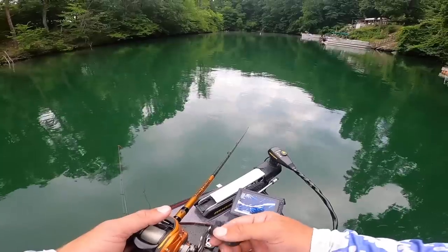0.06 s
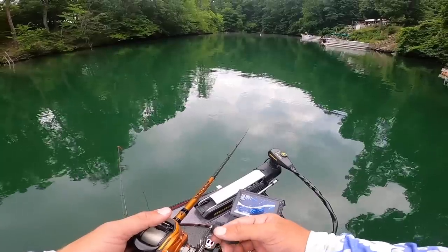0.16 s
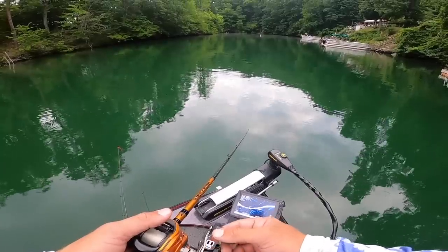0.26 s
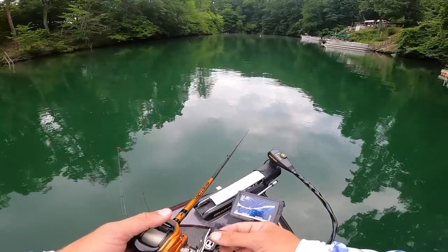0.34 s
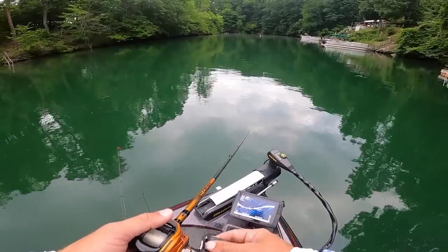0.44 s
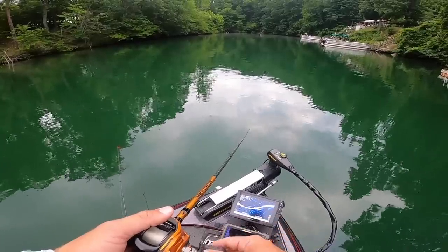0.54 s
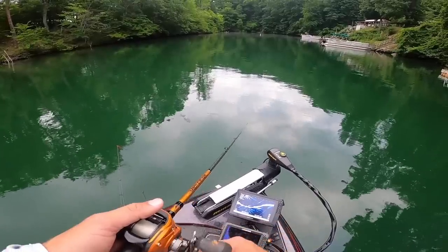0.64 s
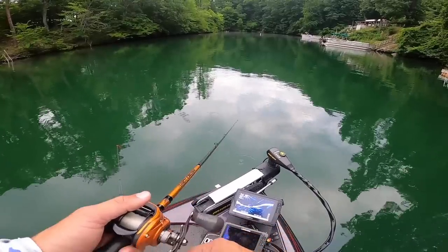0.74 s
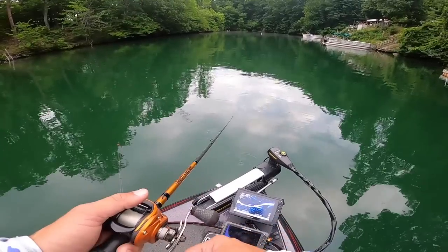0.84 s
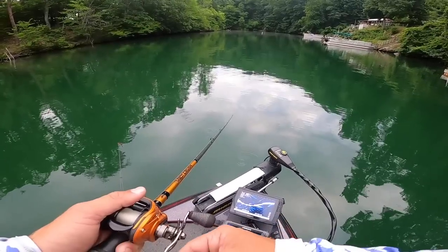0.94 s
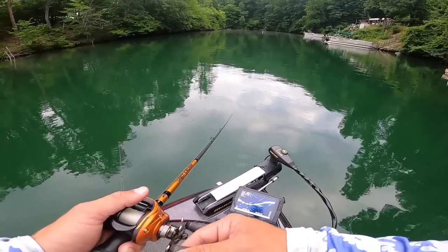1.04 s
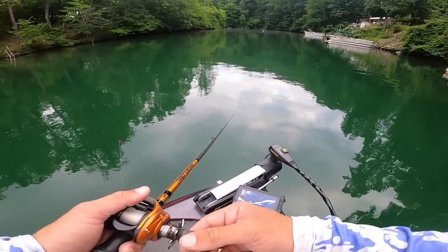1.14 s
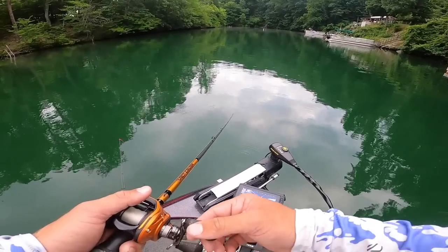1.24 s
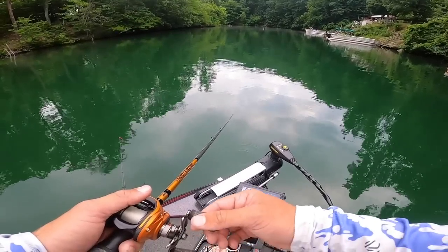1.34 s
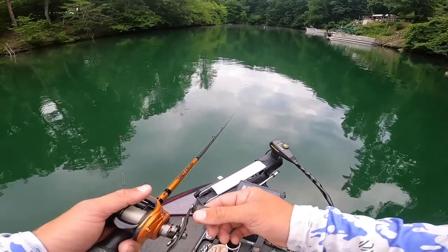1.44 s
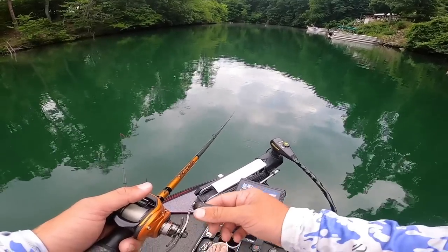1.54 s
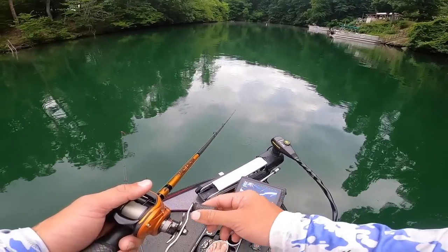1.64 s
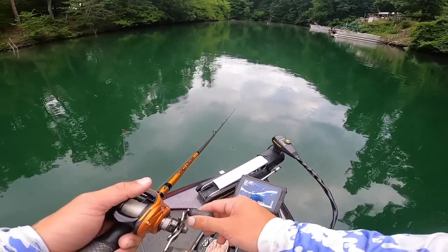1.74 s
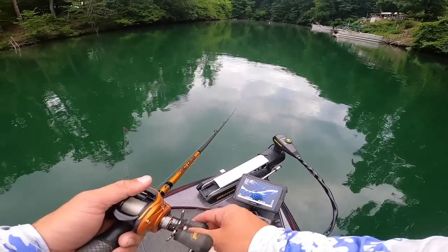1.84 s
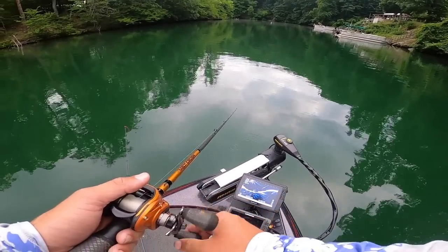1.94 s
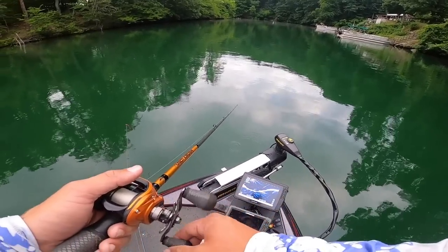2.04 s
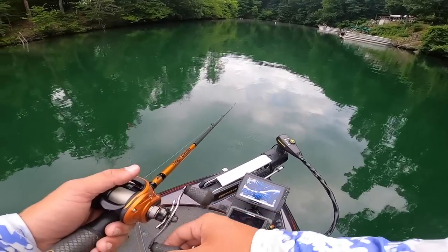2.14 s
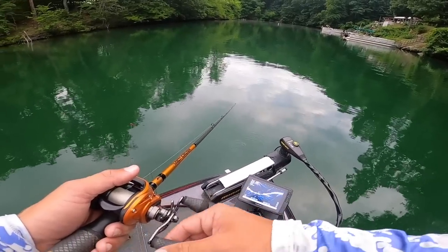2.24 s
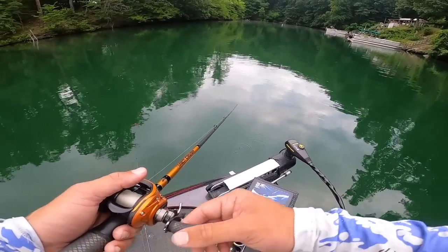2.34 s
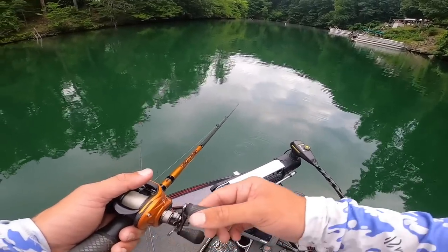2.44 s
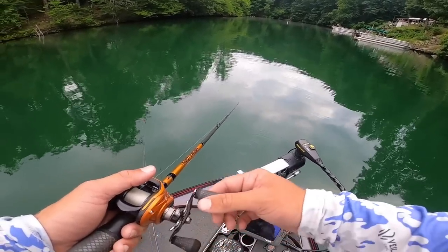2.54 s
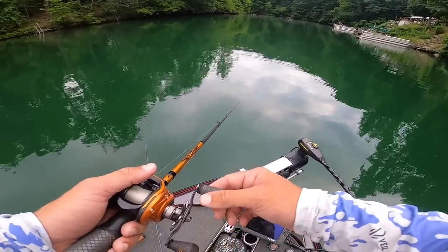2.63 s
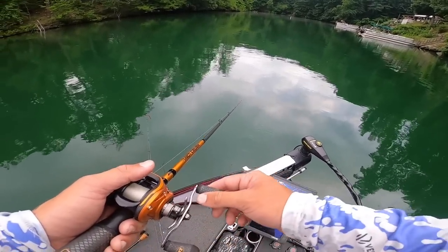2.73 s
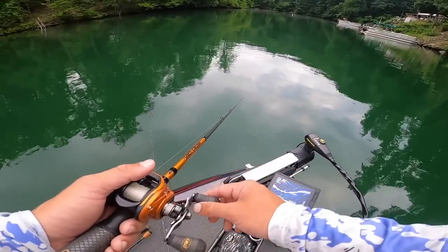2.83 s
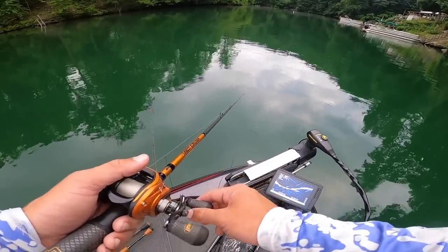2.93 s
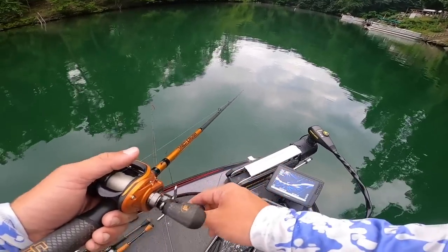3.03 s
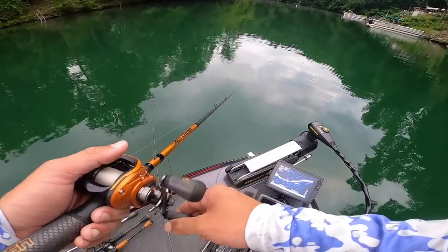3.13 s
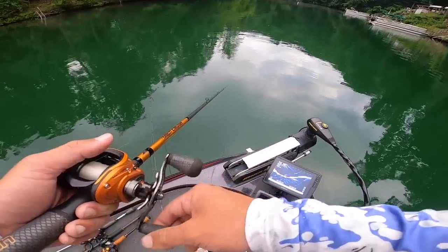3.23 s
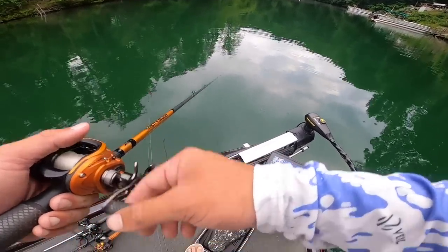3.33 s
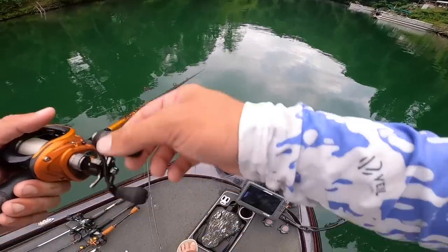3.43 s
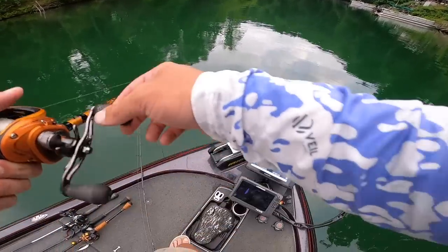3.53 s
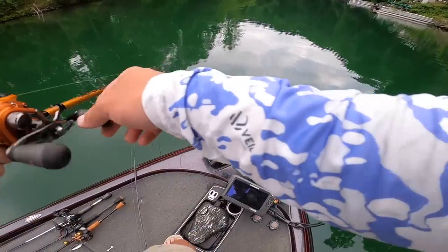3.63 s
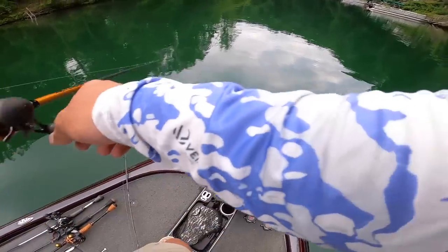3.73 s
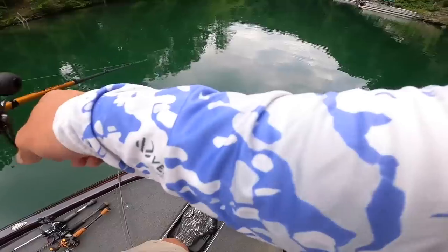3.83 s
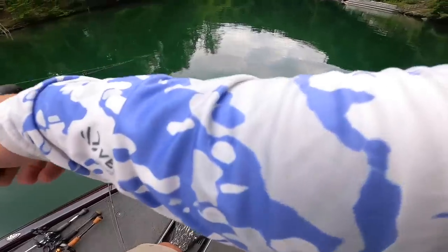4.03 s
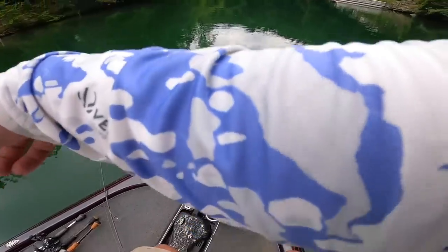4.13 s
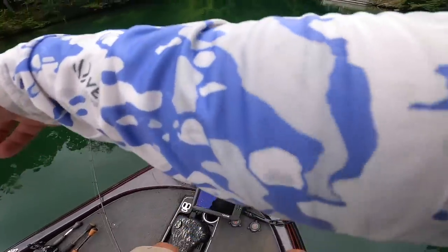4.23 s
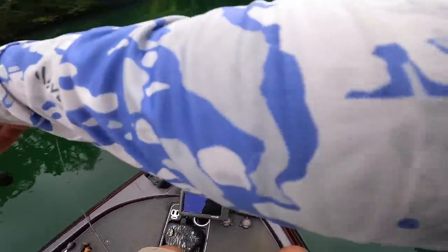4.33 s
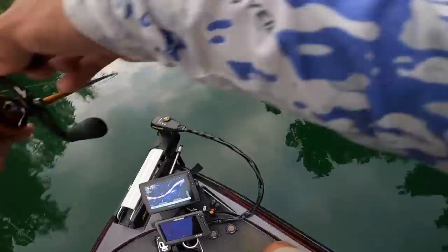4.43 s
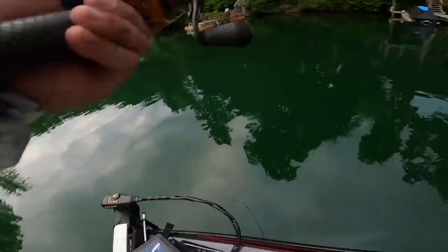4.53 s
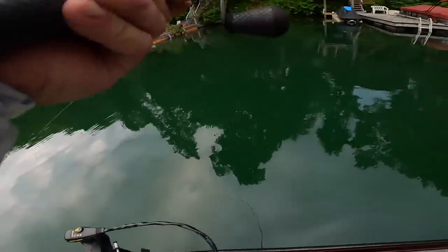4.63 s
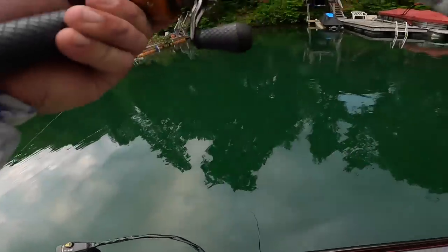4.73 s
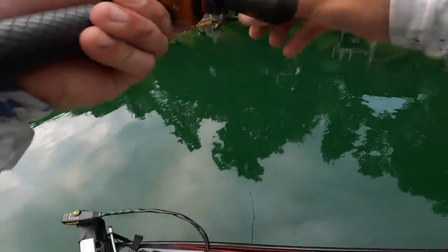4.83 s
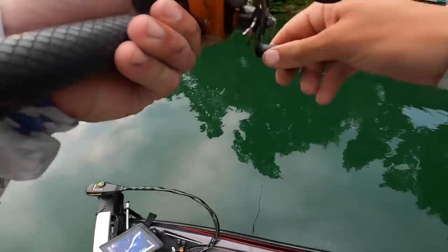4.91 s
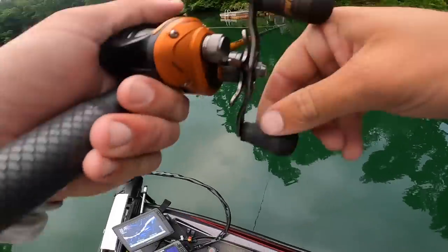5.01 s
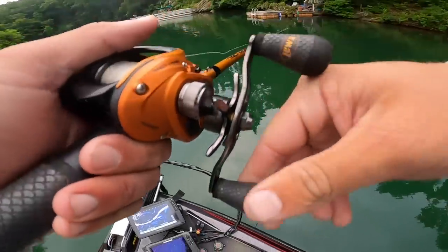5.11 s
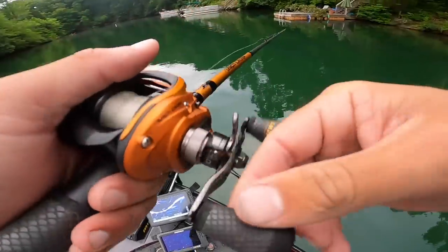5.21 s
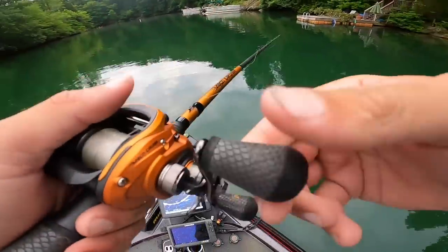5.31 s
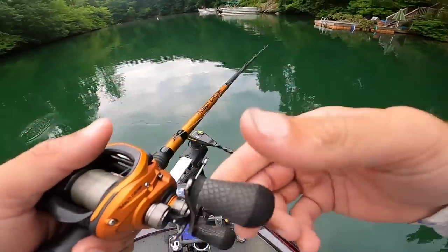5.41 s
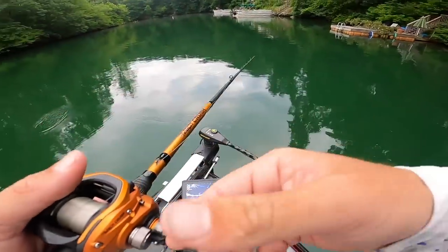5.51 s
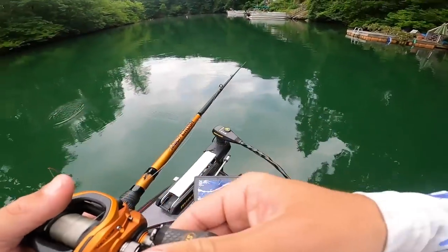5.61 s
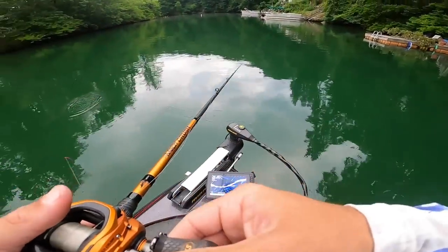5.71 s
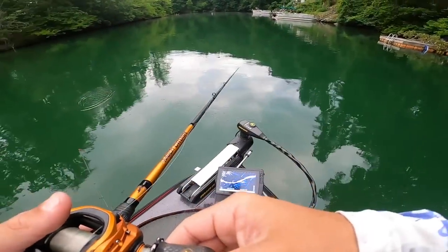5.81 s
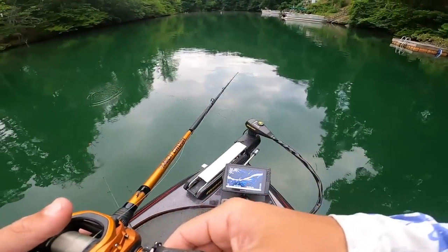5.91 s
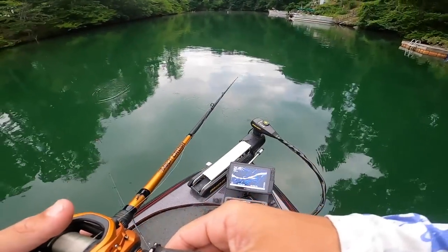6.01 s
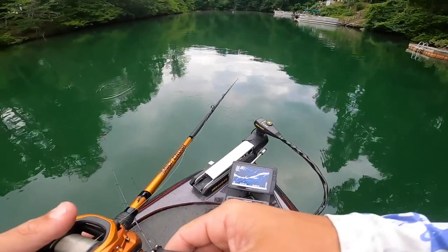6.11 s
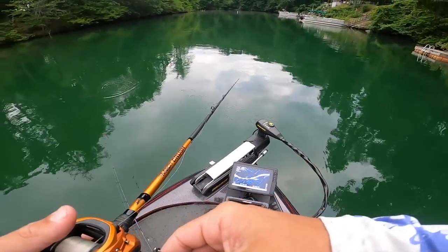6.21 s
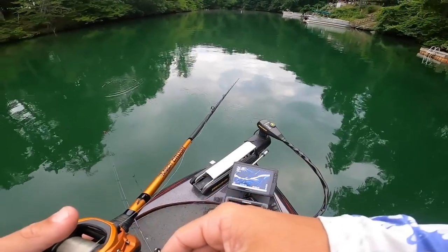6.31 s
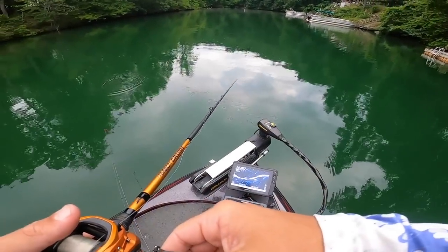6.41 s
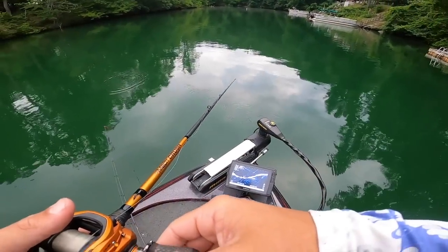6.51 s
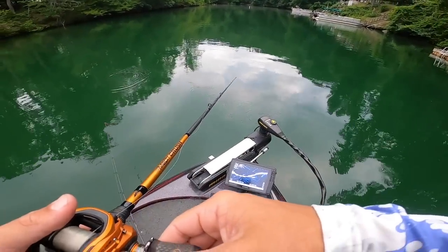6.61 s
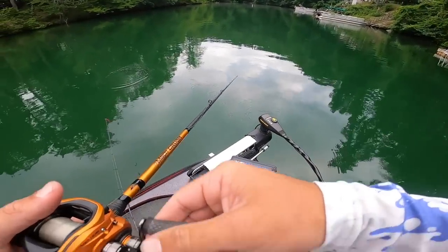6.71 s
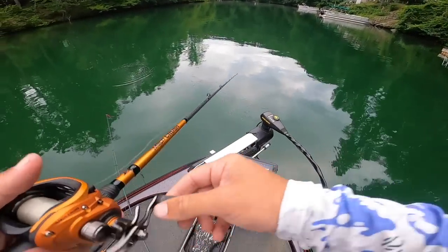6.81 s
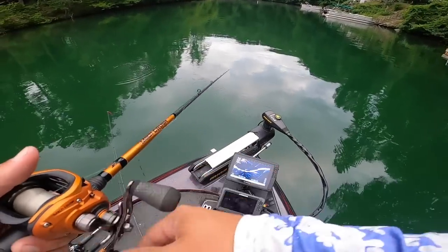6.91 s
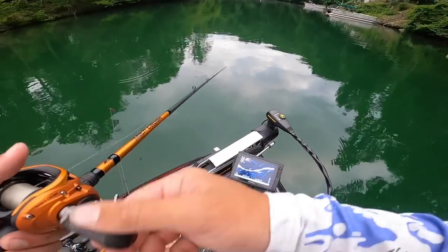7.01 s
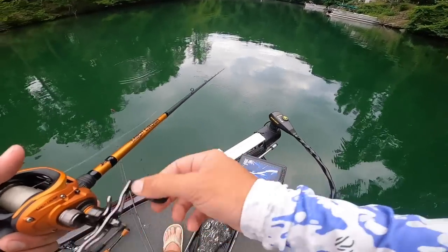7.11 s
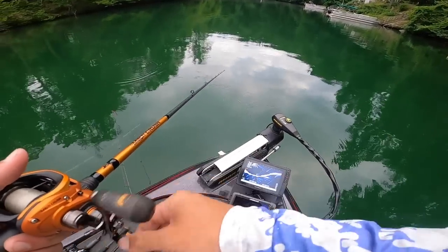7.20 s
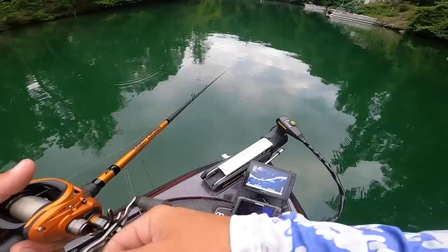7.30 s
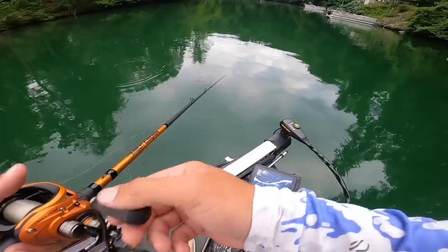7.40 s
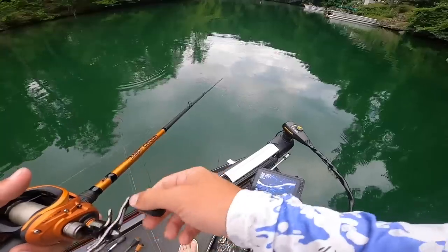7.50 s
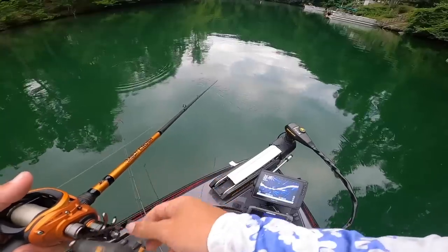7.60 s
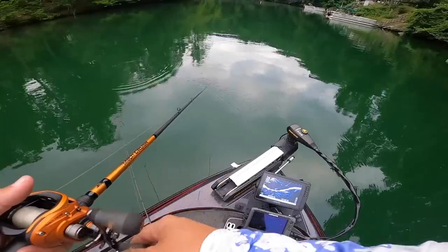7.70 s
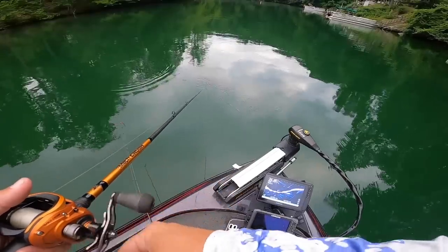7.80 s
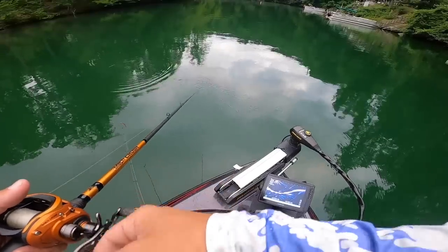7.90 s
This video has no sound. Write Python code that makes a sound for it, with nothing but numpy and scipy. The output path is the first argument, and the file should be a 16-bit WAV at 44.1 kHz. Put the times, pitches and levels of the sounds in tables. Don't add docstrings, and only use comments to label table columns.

```python
import sys
import numpy as np
from scipy import signal
from scipy.fft import rfft, irfft, next_fast_len
from scipy.io import wavfile
from scipy.ndimage import uniform_filter1d, map_coordinates

SR = 44100
rng = np.random.default_rng(int(sys.argv[2]) if len(sys.argv) > 2 else 0)


def materialize(psi):
    bounded = np.clip(np.atleast_2d(psi).T, -1, 1)
    quanta = np.round(bounded * 32767).astype(np.int16)
    wavfile.write(sys.argv[1], SR, quanta)


def voltage_ratio(decibels):
    exponent = np.asarray(decibels, float) / 20
    return 10 ** exponent


N = 350595

# (time [s], left over right [dB])
HAND_SIDE = [(0, 4), (2.2, 1.5), (3.3, 1), (4.4, 1.5), (4.6, 8.5), (5.0, 4), (5.12, 1.5), (7.0, 1),
             (7.9, 22)]


def unit(x):
    return x / np.sqrt(np.mean(x ** 2) + 1e-20)


def along(points, hz):
    f, value = np.transpose(points)
    return np.interp(np.log(hz + 1), np.log(f + 1), value)


def curve(points):
    s, value = np.transpose(points)
    return np.interp(np.arange(N) / SR, s, value)


def wobble(rate):
    knots = rng.standard_normal(int(N * rate / SR) + 4)
    return map_coordinates(knots, [np.arange(N) * rate / SR], order=2)


def during(start, end):
    return (np.arange(N) > start * SR) & (np.arange(N) < end * SR)


def swells(rows):
    t = np.arange(0, N, 32) / SR
    start, end, db, rise, fall = np.array(rows).T[:, :, None]
    before = np.clip((start - t) / rise, 0, None)
    after = np.clip((t - end) / fall, 0, None)
    level = voltage_ratio(db - 20 * before - 20 * after)
    return np.interp(np.arange(N) / SR, t, np.sqrt(np.sum(level ** 2, axis=0)))


def add_at(out, s, hit):
    start = round(s * SR)
    out[..., start:start + hit.shape[-1]] += hit


def filtered(x, response):
    m = next_fast_len(N + SR // 4)
    return irfft(rfft(x, m) * response(np.fft.rfftfreq(m, 1 / SR)), m)[..., :N]


def modes(table):
    def response(f):
        total = 0
        for k, (center, width, db) in enumerate(table):
            damping = 1j * f * width
            total = total + (-1) ** k * voltage_ratio(db) * damping / (center * center - f * f + damping + 1e-9)
        return total
    return response


def band(lo_hz, hi_hz):
    return lambda f: 1 / np.sqrt((1 + (lo_hz / (f + 1)) ** 6) * (1 + (f / hi_hz) ** 6))


def pair(response, grain=1):
    # (frequency [Hz], left-right likeness [0-1])
    likeness = [(30, 0.4), (60, 0.8), (200, 1), (640, 0.57), (1400, 0.78), (6800, 0.39), (12000, 0.091)]

    def mid_side(hz):
        turn = np.arccos(np.clip(along(likeness, hz), -1, 1)) / 2
        return response(hz) * [np.cos(turn), np.sin(turn)]

    mid, side = filtered(grain * rng.standard_normal((2, N)), mid_side)
    return np.array([mid + side, mid - side]) / np.std(mid)


def pan(db):
    half = np.atleast_1d(db) / 2
    return voltage_ratio(np.array([half, -half]))


def patchy(x, depth_db):
    z = signal.stft(x, nperseg=256)[2]
    field = uniform_filter1d(rng.standard_normal(z.shape[1:]), size=4, axis=0)
    field = uniform_filter1d(field, size=5, axis=1)
    return signal.istft(z * voltage_ratio(depth_db * unit(field)), nperseg=256)[1][:, :N]


def lake():
    # (frequency [Hz], density [dB per Hz])
    air_tone = [(40, -43.5), (170, -1), (300, -7), (600, -17), (900, -20), (1150, -12.5), (1700, -16.5),
                (2800, -15.5), (4000, -23), (6000, -20.5), (7600, -27), (8100, -42), (12500, -42.5),
                (15500, -77)]
    # (time [s], level [dB])
    breeze_points = [(0, -62.5), (.7, -62.5), (1.5, -65), (2.4, -60), (2.9, -62), (4.0, -60.5),
                     (4.2, -61.5), (5.5, -57.5), (6.0, -61), (6.2, -70), (6.3, -65), (6.72, -66),
                     (6.9, -60), (7.95, -58.5)]
    # (time [s], level [dB])
    chorus_points = [(0, 0), (2, 0), (4, 0), (5.3, -4), (6, -5), (6.4, 0), (7.95, -3)]
    # (frequency [Hz], width [Hz], level [dB])
    insect_bands = [(7520, 110, 1), (5000, 1600, -6.5), (6250, 300, -11)]
    # (frequency [Hz], width [Hz], level [dB])
    machine = (167.6, 6.6, -64)
    breeze_db = curve(breeze_points)
    air = voltage_ratio(breeze_db + wobble(22)) * pair(lambda f: voltage_ratio(along(air_tone, f)))
    chorus_db = breeze_db + curve(chorus_points) - 16 + 1.4 * wobble(2.68)
    choruses = voltage_ratio(chorus_db) * pair(lambda f: modes(insect_bands)(f) * band(4600, 7800)(f))
    hum = voltage_ratio(machine[2] + 1.2 * wobble(3.6)) * pair(modes([machine]))
    return patchy(air + choruses, depth_db=2.5) + hum


def body_jolts():
    # (time [s], deep rumble [dB], hull boom [dB])
    jolts = [(0.02, -67, -64), (1.05, -65, -60), (1.85, -58, -74), (2.21, -51, -35), (2.55, -53, -46),
             (3.27, -75, -43), (3.45, -48, -36), (3.6, -80, -45.5), (4.07, -60, -46), (4.29, -60, -49),
             (4.5, -55.5, -40), (4.65, -35.5, -39), (4.78, -41, -46.5), (4.9, -40, -41), (5.13, -36, -45),
             (5.45, -42.5, -58), (5.92, -43, -62), (6.35, -54.5, -57), (6.87, -55.5, -54), (7.55, -57, -88),
             (7.75, -59, -69)]
    # (time [s], left over right [dB])
    lean = [(0, 1), (4.4, 1), (5.3, 1), (5.8, 8), (6.5, 5), (7.2, 3), (7.6, 0)]
    rumble_s, boom_s = 0.16, 0.084
    sway = voltage_ratio(-73)
    deep = sway + swells([(s, s, db, rumble_s, rumble_s) for s, db, _ in jolts])
    boom = sway + swells([(s, s, db, boom_s, boom_s) for s, _, db in jolts])
    rumble = deep * pan(curve(lean)) * voltage_ratio(2.8 * wobble(13)) * pair(band(24.3, 57))
    return rumble + boom * voltage_ratio(-3.5 + 3.5 * wobble(25)) * pair(band(83, 172))


def contacts():
    # (time [s], peak [dB], ring [Hz], t60 [ms])
    clacks = [(2.1976, -27, 1170, 23), (2.2103, -35, 1150, 14), (3.219, -27.5, 2320, 5.6),
              (3.3158, -31, 3250, 30), (3.3624, -23, 1600, 45), (3.5053, -36, 1740, 52),
              (3.548, -30, 2950, 27), (3.6557, -34, 3900, 24), (4.054, -43.5, 1430, 81),
              (4.469, -27, 2100, 14), (3.228, -35, 3100, 12), (3.2365, -32, 2400, 12),
              (3.244, -33, 2000, 10), (3.2505, -27, 1900, 20), (3.268, -32, 1700, 18),
              (3.2745, -34, 2300, 14), (3.281, -32, 1500, 14), (3.3225, -34, 3200, 12),
              (6.88, -44, 1890, 15), (6.9257, -35, 1790, 15), (7.199, -39, 1670, 15),
              (7.612, -44, 1770, 15), (6.285, -49.5, 2870, 16), (6.786, -46.5, 1180, 21),
              (6.945, -32, 1710, 8), (7.0945, -38, 1170, 22), (1.8806, -37, 2560, 29)]
    # (time [s], peak [dB], ring [Hz], t60 [ms])
    metal_clicks = [(2.7118, -42.5, 1830, 9.5), (3.2907, -30, 3120, 7.4), (3.4528, -21.5, 3900, 12),
                    (3.4575, -19.5, 3770, 21), (4.5903, -24, 2250, 39), (4.7091, -11.5, 4350, 7),
                    (4.8607, -34.5, 2950, 12), (4.882, -23, 2700, 9.4), (4.943, -25.5, 2860, 8),
                    (5.1107, -26, 3500, 9), (5.1121, -14.5, 3600, 12), (5.1272, -26, 2600, 12),
                    (5.2075, -34.5, 2480, 22), (5.3208, -37, 3630, 14), (5.3971, -23.5, 3420, 23),
                    (5.4225, -36, 3800, 11), (5.4262, -33, 835, 27), (5.665, -40.5, 1740, 13),
                    (7.04, -35, 1790, 13), (7.398, -35.5, 1640, 17)]
    # (time [s], peak [dB], ring [Hz])
    small_ticks = [(0.0997, -57, 6090), (0.1171, -53, 6290), (0.7248, -46, 5570), (1.0814, -53, 6400),
                   (1.28, -48, 4930), (1.5848, -52, 6200), (1.6242, -52, 5510), (1.6801, -51, 7530),
                   (1.8771, -46, 4680), (3.237, -38, 5700), (3.2515, -36, 5600), (3.278, -44, 7000),
                   (3.292, -38, 7000), (3.307, -42, 7000), (3.316, -41, 7000), (3.331, -40, 4800),
                   (3.343, -41, 7100), (4.7094, -26, 9500), (5.1125, -29, 9500), (5.1275, -32, 5000),
                   (4.811, -41, 4500), (4.929, -36, 5500), (4.9435, -32, 6200), (5.069, -42, 7000),
                   (5.398, -36, 9500), (0.735, -43.5, 5500), (0.9268, -46.5, 5440), (1.1154, -50, 4620),
                   (1.158, -47.5, 5600), (1.2581, -43, 5200), (1.504, -47, 6810), (2.3775, -46, 2600),
                   (2.5143, -42, 5000), (3.4792, -32, 3640), (3.6661, -38, 4200), (3.739, -36.5, 3500),
                   (3.8215, -39, 3700), (3.8433, -40, 3430), (4.4792, -28.5, 5100), (4.5376, -26.5, 5060),
                   (4.5417, -28, 5400), (4.5565, -26, 3430), (4.5687, -27, 5270), (4.581, -26, 5800),
                   (4.5953, -24, 5600), (4.546, -31, 4500), (4.5592, -28, 5000), (4.5852, -22, 5000),
                   (4.5915, -25, 4600), (4.8945, -24, 4350), (4.9021, -21.5, 4400), (4.919, -32, 3000),
                   (4.965, -35, 6800), (5.001, -37, 4900), (5.08, -36, 5300), (5.3754, -43, 3430),
                   (7.863, -45, 6800), (3.3618, -27, 3700), (4.7098, -22, 1700), (6.82, -52, 6800),
                   (5.118, -33, 3800)]
    sparkle_levels = (-35.5, -11, -13)
    ticks = [(s, db, hz, 6.5) for s, db, hz in small_ticks]
    out = np.zeros((2, N + SR))
    t = np.arange(SR // 16) / SR
    f = np.fft.rfftfreq(len(t), 1 / SR)
    for rows, sparkle_db in zip((clacks, metal_clicks, ticks), sparkle_levels):
        for s, db, hz, t60_ms in rows:
            decay = voltage_ratio(-60 * t / (max(t60_ms, 2) / 1000)) * (1 - np.exp(-t / 0.00012))
            crack = decay * rng.standard_normal((3, len(t)))
            crack[0, 4] += 4.5
            ring = modes([(hz, .4 * hz, 0)])(f) ** 2
            body = modes([(.45 * hz, .5 * hz, -9), (1.9 * hz, .6 * hz, sparkle_db / 3 - 3),
                          (6000, 3500, sparkle_db)])(f)
            tone = (ring + body) * band(.25 * hz, 7200)(f)
            ports = crack[0] + 0.8 * crack[1:]
            hit = irfft(rfft(ports) * tone, len(t)) * (1 - t / t[-1])
            add_at(out, s, voltage_ratio(db + 2.5) * hit / np.abs(hit).max())
    return out[:, :N] * pan(0.27 * curve(HAND_SIDE))


def gear_teeth(hz, uneven_db):
    passing = np.diff(np.floor(np.cumsum(hz) / SR), prepend=0)
    return passing * voltage_ratio(uneven_db * wobble(300))


def slow_cranking():
    # (start [s], end [s], teeth a second [Hz], level [dB])
    creep = [(0.298, 0.344, 46.5, -62), (0.501, 0.599, 64.1, -61.5), (0.661, 0.779, 85.6, -64),
             (0.814, 0.859, 90, -60.5), (.92, 0.999, 80.5, -61), (1.44, 1.496, 64.8, -80),
             (1.57, 1.69, 61.4, -62), (1.704, 1.787, 62.2, -60), (1.837, 1.991, 74.6, -61.5),
             (2.038, 2.1, 79.8, -62.5), (2.298, 2.482, 74.9, -62.5), (2.495, 2.698, 63.7, -62)]
    hz = sum(during(start, end) * rate for start, end, rate, db in creep) * (1 + 0.047 * wobble(30))
    gain = sum(during(start, end) * voltage_ratio(db + 38.5) for start, end, rate, db in creep)
    housing = lambda f: modes([(1400, 600, 0)])(f) * band(900, 2300)(f)
    return filtered(gain * gear_teeth(hz, uneven_db=2.5), housing) * pan(3)


def birds():
    # (start [s], end [s], first pitch [Hz], last pitch [Hz], level [dB])
    high_notes = [(6.434, 6.474, 4710, 4800, -75), (6.459, 6.492, 4930, 5000, -71),
                  (6.491, 6.525, 3980, 3870, -75), (0.432, 0.458, 4450, 4540, -83),
                  (0.47, 0.51, 5400, 5350, -73), (.53, 0.55, 4850, 4700, -76),
                  (0.572, 0.61, 5350, 5400, -74.5), (0.644, 0.676, 4480, 4400, -79)]
    # (start [s], end [s], first pitch [Hz], last pitch [Hz], level [dB])
    low_notes = [(0.42, 0.46, 2600, 2900, -76), (0.545, 0.575, 2600, 2900, -75),
                 (0.672, .715, 2560, 2600, -72), (0.69, .735, 2800, 3700, -74), (.71, .76, 2800, 3050, -70),
                 (.77, .81, 3200, 2900, -74), (4.13, 4.21, 2700, 2650, -71),
                 (4.375, 4.395, 2750, 3000, -68), (2.418, 2.47, 3450, 3450, -67.5),
                 (2.493, 2.53, 2520, 2600, -64), (2.515, 2.562, 2700, 3650, -66),
                 (2.565, 2.6, 3900, 3300, -72), (2.432, 2.45, 3050, 2900, -70),
                 (2.588, 2.64, 3050, 2700, -63), (3.111, 3.192, 2368, 2140, -67.5),
                 (4.21, 4.236, 2800, 3000, -70), (4.24, 4.258, 3500, 3650, -67),
                 (4.265, 4.29, 3850, 4150, -73), (4.275, 4.292, 3000, 2750, -64),
                 (4.295, 4.345, 2760, 2930, -64), (4.41, 4.45, 2220, 2340, -65),
                 (6.329, 6.37, 2980, 3070, -72.5), (6.363, 6.401, 2900, 2695, -70),
                 (6.39, 6.42, 3200, 3700, -70), (6.42, 6.46, 3700, 3650, -74),
                 (6.572, 6.609, 2820, 3070, -62), (6.595, 6.639, 2515, 2500, -64),
                 (6.622, 6.685, 2800, 4060, -64.5), (6.685, 6.725, 4050, 3000, -66),
                 (6.655, 6.68, 3000, 3250, -66), (6.75, 6.78, 3000, 3500, -68)]
    # (time [s], level [dB], top pitch [Hz])
    chip_calls = [(0.761, -54.5, 7170), (2.294, -54.5, 7680), (3.51, -57, 7350), (6.341, -59.5, 7260)]
    # (length [s], first pitch [Hz])
    chip_shape = (0.018, 5600)
    length_s, first_hz = chip_shape
    notes = [(*note, 1) for note in list(high_notes) + list(low_notes)]
    notes += [(s, s + length_s, first_hz, top_hz, db, .3) for s, db, top_hz in chip_calls]
    waver = 1 + 0.0183 * wobble(120)
    out = np.zeros(N + SR)
    for start, end, hz0, hz1, db, bend in notes:
        u = np.linspace(0, 1, round((end - start) * SR))
        hz = (hz0 + (hz1 - hz0) * u ** bend) * waver[round(start * SR):][:len(u)]
        whistle = np.sin(2 * np.pi * np.cumsum(hz) / SR)
        add_at(out, start, voltage_ratio(db + 10.5) * np.sin(np.pi * u) ** 0.077 * whistle)
    song = out[:N] * voltage_ratio(2.5 * wobble(200))
    t = np.arange(SR // 2) / SR
    trees = rng.standard_normal((2, len(t))) * voltage_ratio(-60 * t / 0.4)
    echo = signal.fftconvolve(song[None], trees / np.linalg.norm(trees[0]), axes=1)[:, :N]
    echo = filtered(echo, band(500, 5600))
    return voltage_ratio(-7.5) * song + voltage_ratio(-2) * patchy(echo, depth_db=3.5)


def hands():
    # (start [s], end [s], level [dB], fall [s], weight of the hand [dB])
    rubs = [(2.104, 2.119, -53, 0.026, -21), (2.184, 2.237, -54.5, 0.044, 2.5),
            (3.231, 3.296, -42, .08, -8), (3.37, 3.39, -46, .065, 1.5), (3.454, 3.453, -41.5, 0.15, -13),
            (3.51, 3.623, -53.5, 0.51, -36), (4.278, 4.44, -57, .1, -8), (4.462, 4.495, -47.5, 0.056, -5.5),
            (4.541, 4.578, -42, .1, -11), (4.585, 4.648, -40, 0.11, -4), (4.682, 4.714, -46, 0.061, 4),
            (4.802, 4.82, -53.5, 0.089, -4), (4.876, 4.966, -48, 0.041, -9.5),
            (4.986, 5.21, -55.5, 0.12, -3.5), (5.307, 5.353, -48, 0.083, -5),
            (5.376, 5.433, -54, 0.037, 1.5), (6.776, 6.9, -57.5, .1, -23), (6.927, 6.956, -42, 0.043, -10),
            (7.045, 7.16, -51.5, 0.12, -7), (7.21, 7.36, -54.5, .1, -13), (7.403, 7.696, -57.5, 0.11, -9)]
    # (start [s], end [s], level [dB])
    swishes = [(2.09, 2.283, -63), (3.235, 3.334, -49), (3.365, 3.523, -55), (3.56, 4.075, -62),
               (4.438, 4.532, -55.5), (4.567, 4.6, -41), (4.66, 4.7, -47), (4.893, 4.979, -45.5),
               (5.03, 5.216, -54), (5.302, 5.422, -53.5), (6.941, 6.975, -46), (7.002, 7.42, -55),
               (7.43, 7.695, -67.5)]
    # (frequency [Hz], density [dB per Hz])
    cloth_tone = [(200, 3), (400, -6.5), (800, -5.5), (3900, -7), (6800, -10), (8000, -21), (12600, -32),
                  (15500, -71)]
    # (frequency [Hz], width [Hz], level [dB])
    reel_modes = [(1066, 290, -5.5), (1740, 410, 0), (2350, 1400, -2.5), (3000, 580, -1.5)]
    rub_rise_s, swish_rise_s, swish_fall_s = 0.03, 0.052, 0.043
    slide = swells([(start, end, db, rub_rise_s, fall) for start, end, db, fall, _ in rubs])
    press = swells([(start, end, db + weight, rub_rise_s, fall) for start, end, db, fall, weight in rubs])
    swish = swells([(start, end, db, swish_rise_s, swish_fall_s) for start, end, db in swishes])
    catches = voltage_ratio(1.3 * wobble(120) + 2.6 * wobble(900))
    cloth = lambda lo, hi: pair(lambda f: voltage_ratio(along(cloth_tone, f)) * band(lo, hi)(f), catches)
    frame = pair(lambda f: (0.69 + np.abs(modes(reel_modes)(f))) * band(900, 3500)(f), catches)
    rub = slide * voltage_ratio(-1.5) * frame
    rub = rub + swish * voltage_ratio(-4.5) * cloth(3500, 17000)
    rub = rub + press * voltage_ratio(-2.5) * cloth(270, 880)
    return pan(curve(HAND_SIDE)) * patchy(rub, depth_db=1.5)


def grip_thumps():
    # (time [s], peak [dB], pitch [Hz])
    thumps = [(2.196, -21.5, 159.7), (2.205, -25.5, 92.7), (2.236, -29, 81.2), (2.48, -33.5, 103),
              (2.517, -32.5, 95), (3.427, -36.5, 121), (4.055, -41, 146), (4.659, -21, 152),
              (5.114, -27.5, 77.8), (6.899, -40, 155.3), (7.143, -36, 173)]
    # (time [s], peak [dB], pitch [Hz])
    knocks = [(2.481, -33, 323), (4.056, -31, 400), (4.273, -40.5, 315), (4.48, -25, 430),
              (4.598, -18, 353), (4.743, -26, 504), (4.753, -22, 515), (5.111, -35, 322),
              (6.89, -38.5, 415)]
    t = np.arange(SR // 5) / SR
    out = np.zeros((2, N + SR))
    for s, db, hz in list(thumps) + list(knocks):
        t60_s = 7 / hz
        ring = np.sin(2 * np.pi * hz * t + np.array([[.95], [-.95]]))
        add_at(out, s, voltage_ratio(db + 5.0 - 60 * t / t60_s) * (1 - np.exp(-t / 0.0026)) * ring)
    return out[:, :N]


def rod_whip():
    # (start [s], end [s], level [dB], rise [s], fall [s])
    cast = (4.605, 4.67, -37.5, .03, .09)
    # (frequency [Hz], density [dB per Hz])
    rush_tone = [(500, -12), (1500, -6), (2350, 1.5), (3200, -8), (4300, -6), (6200, -4), (7500, -9),
                 (8200, -28), (15000, -50)]
    rush = pair(lambda f: voltage_ratio(along(rush_tone, f)) * (f > 300))
    return swells([cast]) * pan(6) * patchy(rush, depth_db=2.5)


def struck_ring(t, hz, db, t60, rise):
    return voltage_ratio(db - 60 * t / t60) * (1 - np.exp(-t / rise)) * np.sin(2 * np.pi * hz * t)


def spool_taps():
    # (time [s], peak [dB], pitch [Hz])
    taps = [(4.7985, -33, 2640), (4.803, -33, 2600), (4.811, -37, 2600), (4.8232, -31, 2550),
            (4.859, -38, 2800), (4.8715, -36, 2950), (4.909, -37, 2900), (4.9922, -36, 2700),
            (5.018, -40, 2700), (5.046, -40, 2500), (5.069, -39, 2650)]
    t60_s, rise_s = .02, .0008
    t = np.arange(SR // 20) / SR
    out = np.zeros((2, N + SR))
    for s, db, hz in taps:
        note = struck_ring(t, hz, db + 4, t60_s, rise_s)
        note = note + struck_ring(t, 1.13 * hz, db - 3, t60_s, rise_s)
        add_at(out, s, pan(5) * note)
    return out[:, :N]


def spool_whir():
    # (fastest [s], caught [s], fastest level [dB], coasting level [dB])
    free_spin = (4.89, 5.105, -47.5, -51.5)
    # (frequency [Hz], width [Hz], level [dB])
    plate_modes = [(2480, 210, -1.5), (2950, 340, -4.5)]
    fastest, caught, fastest_db, coasting_db = free_spin
    rattle = voltage_ratio(3.5 * wobble(250) + 2.5 * wobble(70))
    spin = swells([(fastest, fastest + .07, fastest_db, .06, .1), (fastest, caught, coasting_db, .05, .005)])
    return spin * pan(6) * pair(modes(plate_modes), rattle)


def clutch():
    # (time [s], peak [dB], rise [s])
    snap = (5.1123, -15, .0006)
    # (frequency [Hz], level [dB], t60 [s])
    clutch_modes = [(1290, 0, .009), (1550, -3, .008), (2487, -5, .015), (3200, -10, .012),
                    (4460, -11, .008), (5600, -11, .007), (6500, -15, .006)]
    s, db, rise = snap
    t = np.arange(SR // 20) / SR
    out = np.zeros((2, N + SR))
    for hz, level, t60 in clutch_modes:
        add_at(out, s, struck_ring(t, hz, db + level + 6, t60, rise))
    return out[:, :N]


def fast_cranking():
    # (start [s], end [s], level [dB])
    turns = [
        (6.93, 7.0, -53),
        (7.09, 7.17, -52),
        (7.2, 7.385, -47),
    ]
    # (fastest [s], teeth a second [Hz])
    pushes = [
        (6.985, 310.0),
        (7.13, 299.8),
        (7.27, 299.6),
    ]
    # (frequency [Hz], width [Hz], level [dB])
    gearbox_modes = [(286, 180, -3.5), (600, 200, 0), (950, 300, 1), (1650, 400, 1), (3000, 500, -4)]
    speeds_up, slows_down = 780, 640
    louder_db = 0.2
    t = np.arange(N) / SR
    speeds = [top - np.maximum(speeds_up * (s - t), slows_down * (t - s)) for s, top in pushes]
    hz = np.max(speeds, axis=0).clip(200)
    teeth = gear_teeth(hz * (1 + 0.009 * wobble(200)), uneven_db=3.0)
    buzz = unit(filtered(teeth, modes(gearbox_modes)))
    turning = swells([(*turn, .015, .02) for turn in turns])
    return turning * voltage_ratio(louder_db * (hz - hz.max()) + 2.0) * buzz * pan(3)


def scene():
    far = lake() + birds()
    handling = body_jolts() + contacts() + hands() + grip_thumps()
    cast = rod_whip() + spool_taps() + spool_whir() + clutch()
    return far + handling + cast + slow_cranking() + fast_cranking()


def top_cut(x):
    return signal.sosfilt(signal.butter(12, 16460, fs=SR, output="sos"), x)


def record(dry):
    # (frequency [Hz], lead of the left port [radians])
    port_lead = [(30, -0.75), (700, -0.57), (3100, -0.43), (5000, -0.065), (9000, 1)]
    ports = np.array([[1], [-1]])
    lead = lambda hz: np.exp(.5j * along(port_lead, hz) * ports) * (hz < 15700)
    return top_cut(filtered(dry, lead))


dry = scene()
out = record(dry)
materialize(out)
```